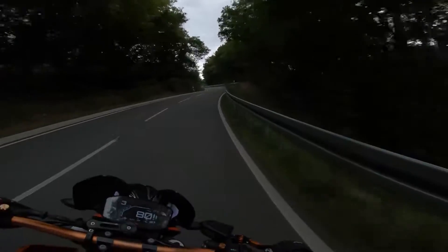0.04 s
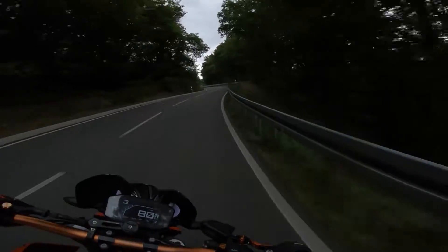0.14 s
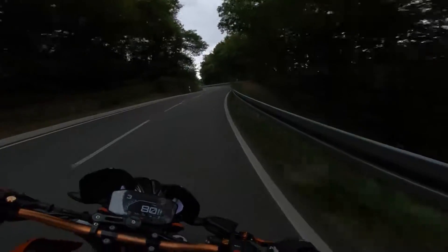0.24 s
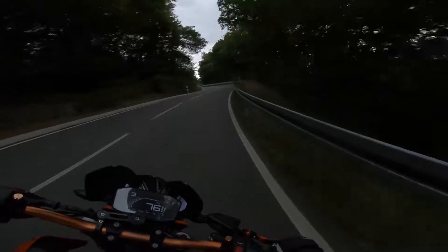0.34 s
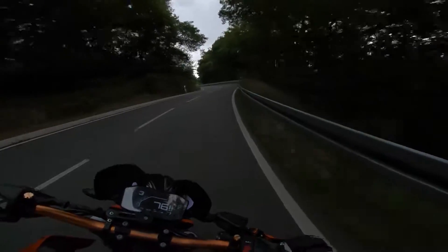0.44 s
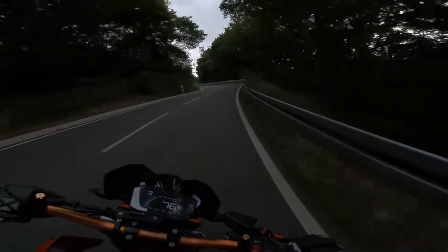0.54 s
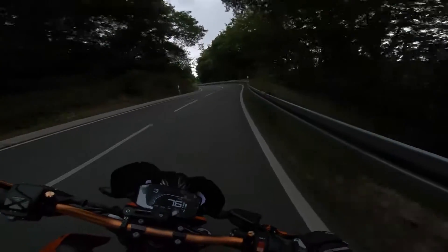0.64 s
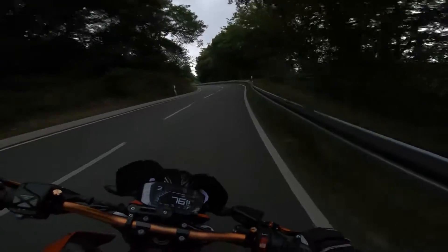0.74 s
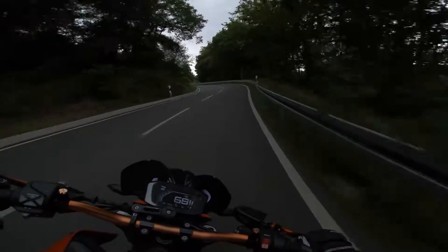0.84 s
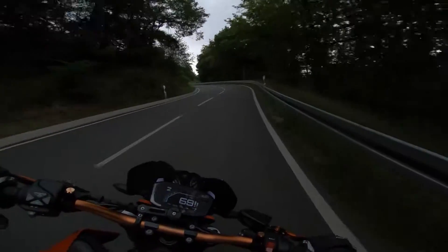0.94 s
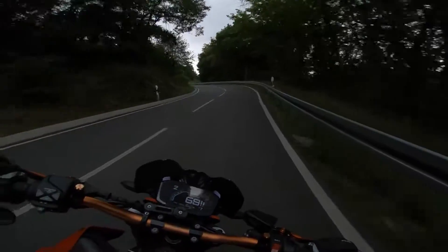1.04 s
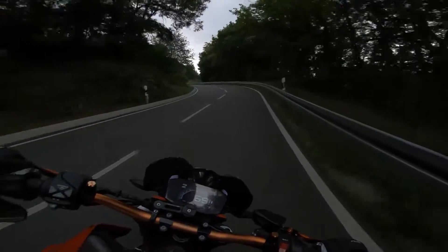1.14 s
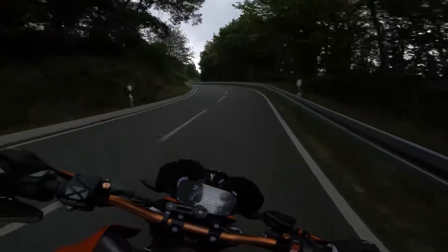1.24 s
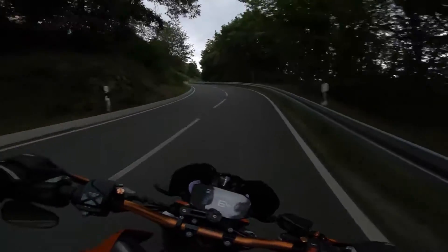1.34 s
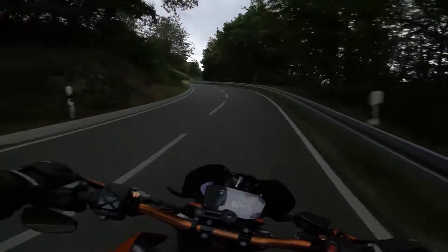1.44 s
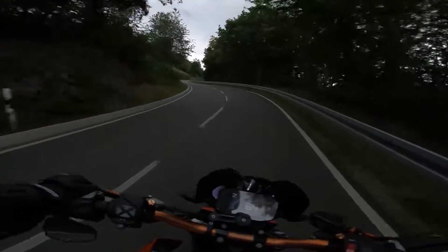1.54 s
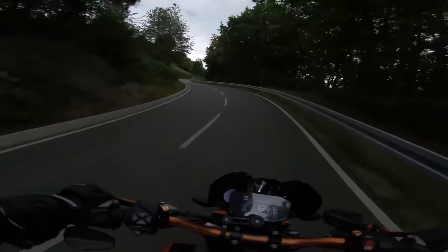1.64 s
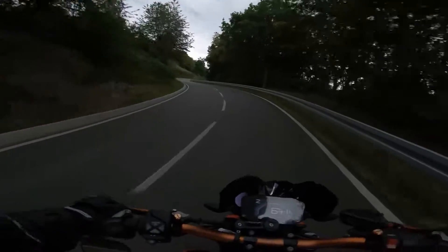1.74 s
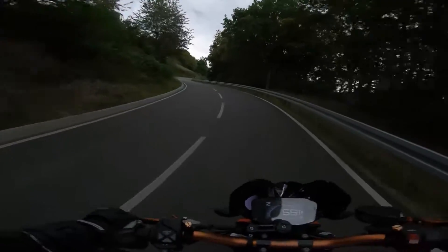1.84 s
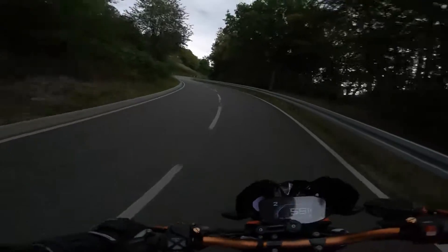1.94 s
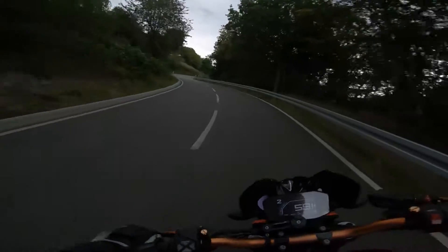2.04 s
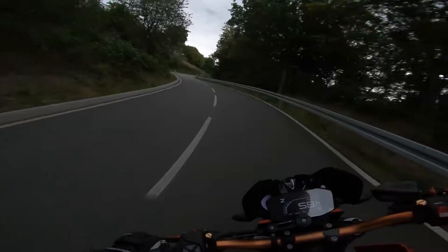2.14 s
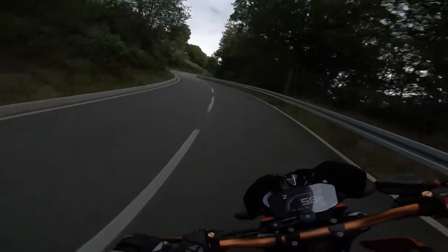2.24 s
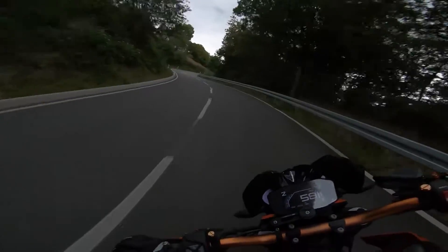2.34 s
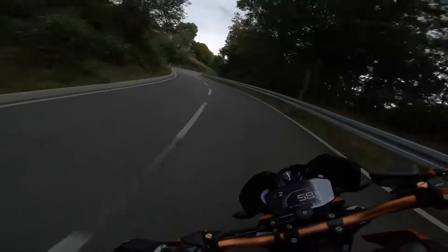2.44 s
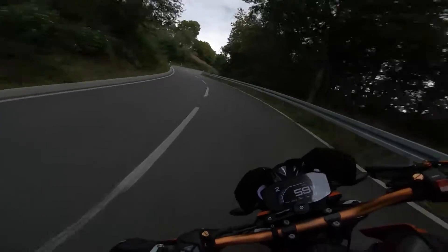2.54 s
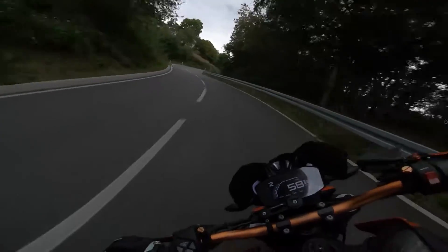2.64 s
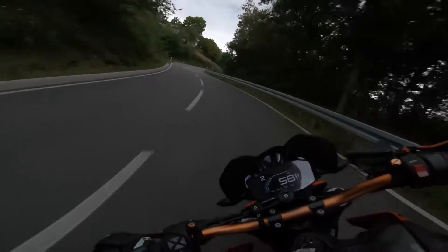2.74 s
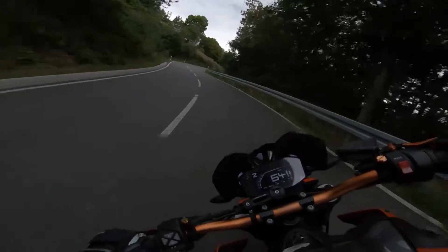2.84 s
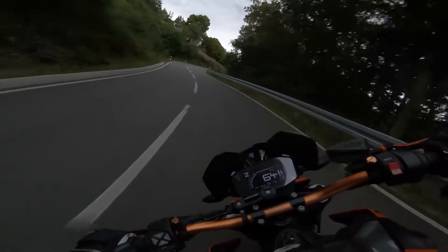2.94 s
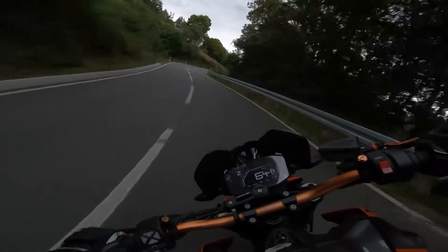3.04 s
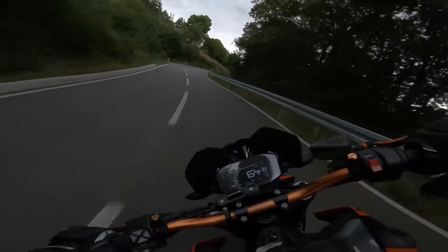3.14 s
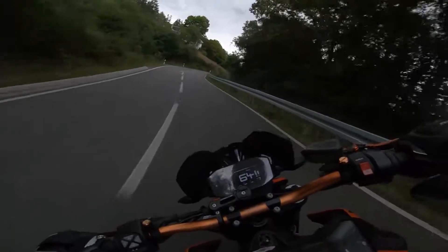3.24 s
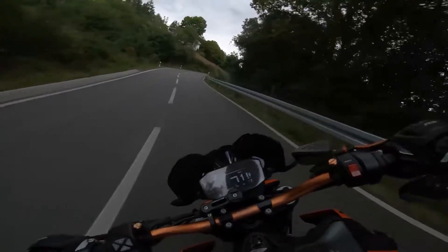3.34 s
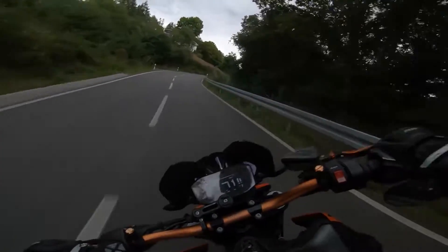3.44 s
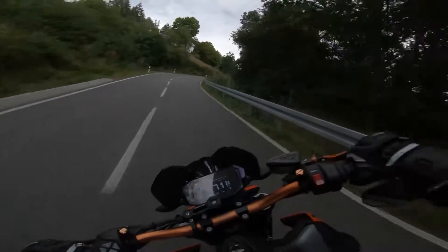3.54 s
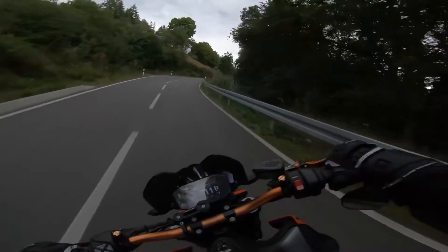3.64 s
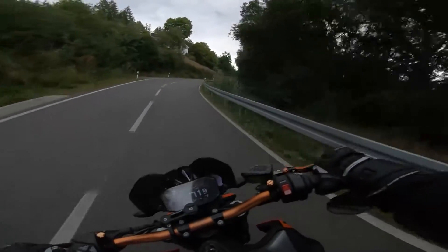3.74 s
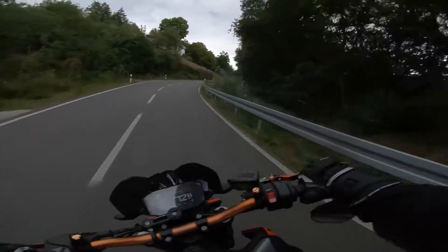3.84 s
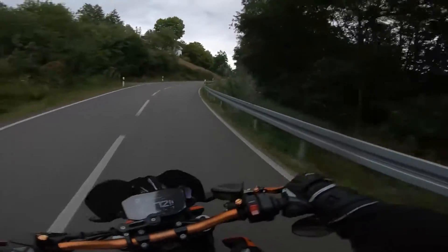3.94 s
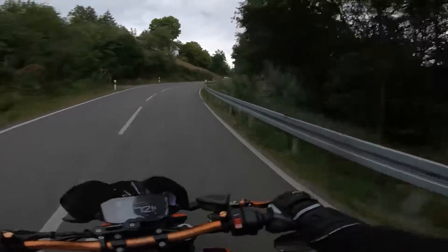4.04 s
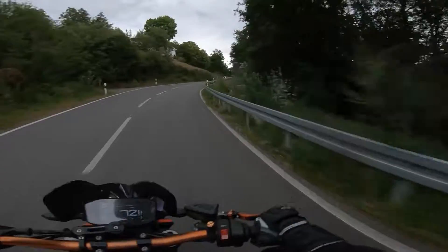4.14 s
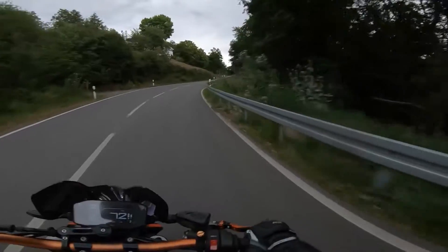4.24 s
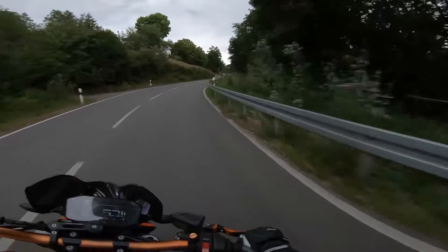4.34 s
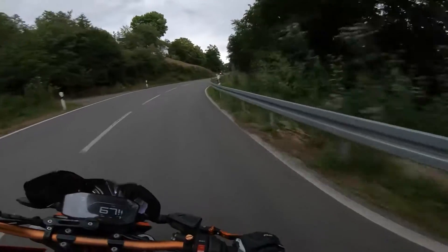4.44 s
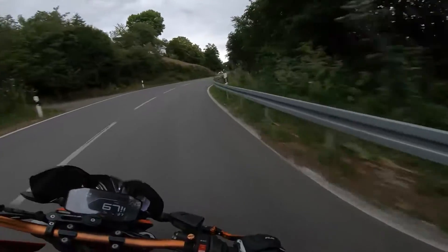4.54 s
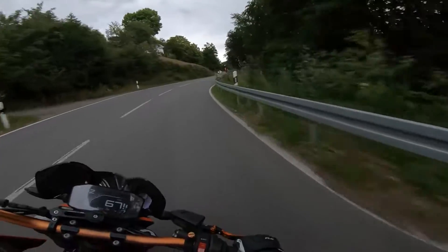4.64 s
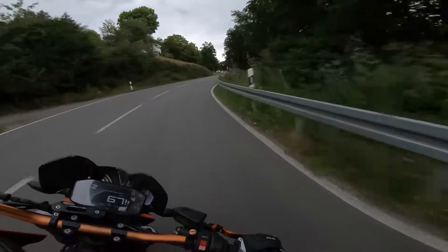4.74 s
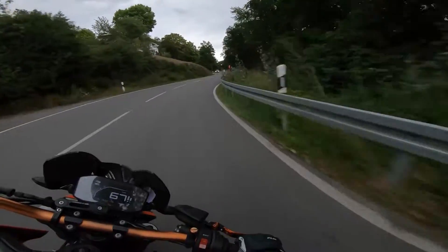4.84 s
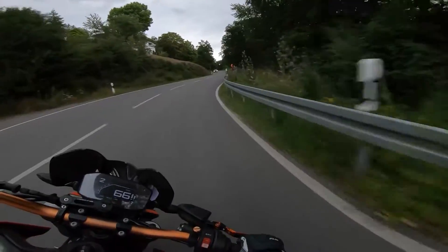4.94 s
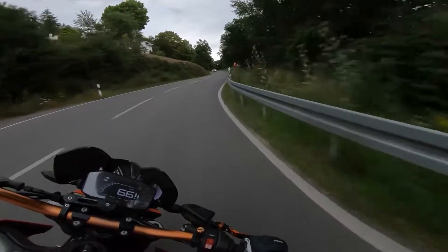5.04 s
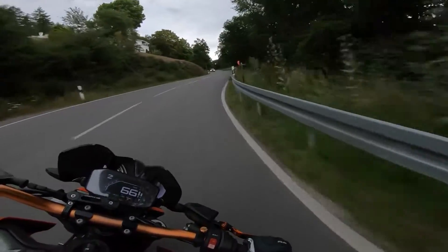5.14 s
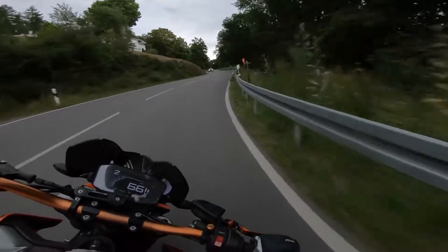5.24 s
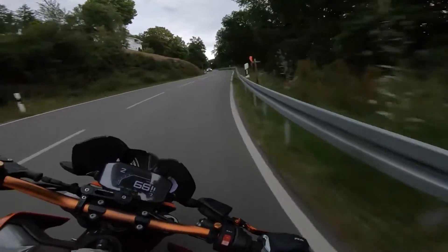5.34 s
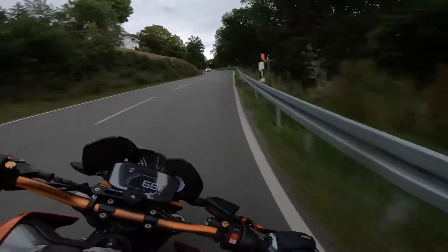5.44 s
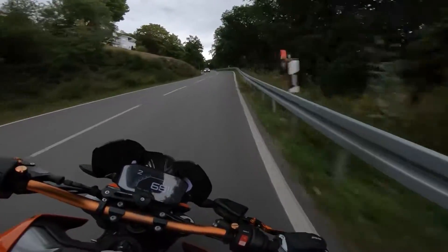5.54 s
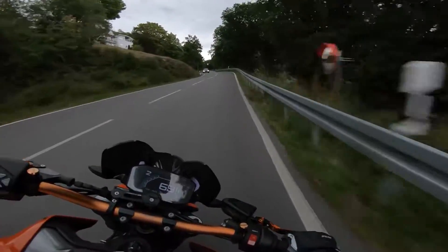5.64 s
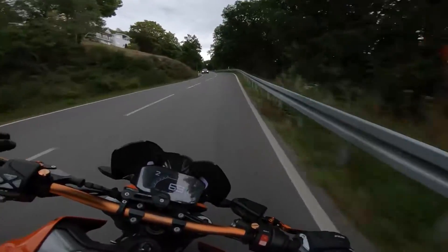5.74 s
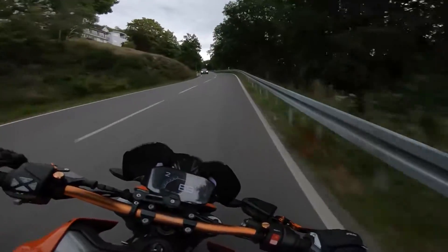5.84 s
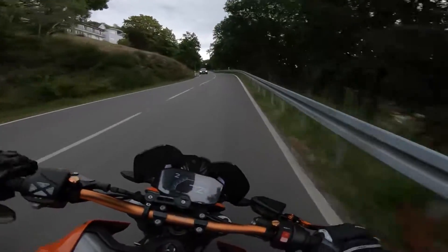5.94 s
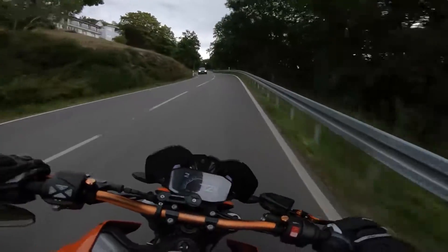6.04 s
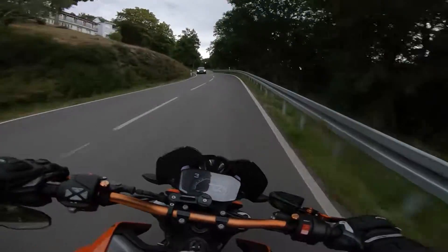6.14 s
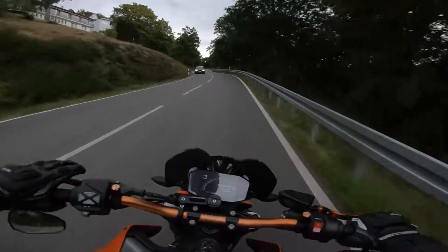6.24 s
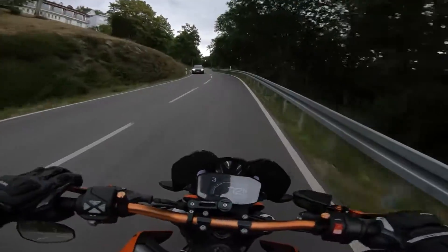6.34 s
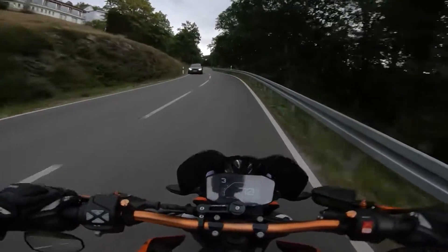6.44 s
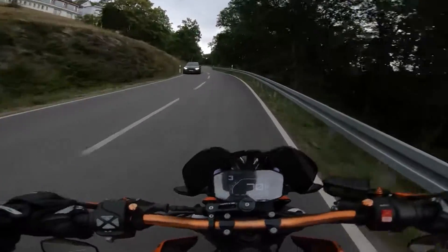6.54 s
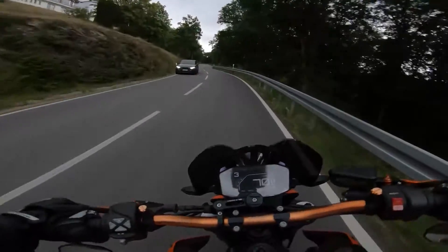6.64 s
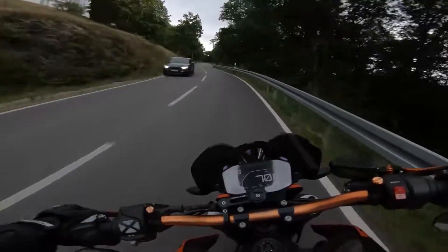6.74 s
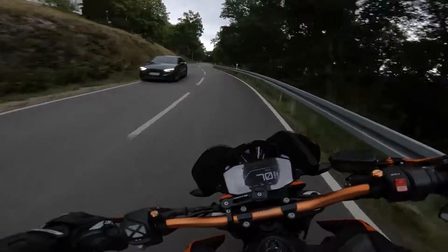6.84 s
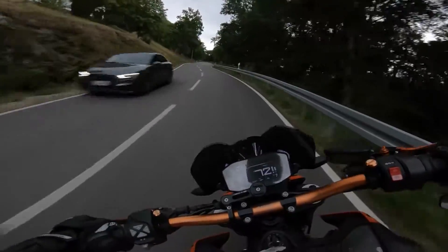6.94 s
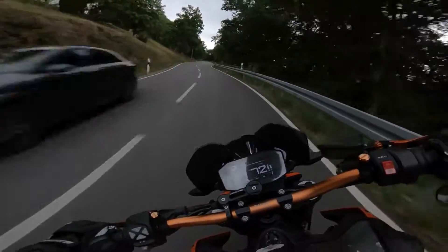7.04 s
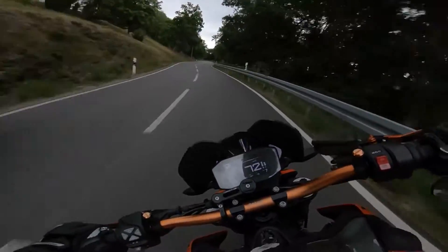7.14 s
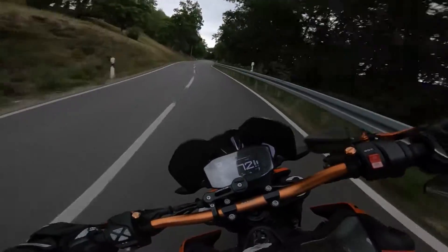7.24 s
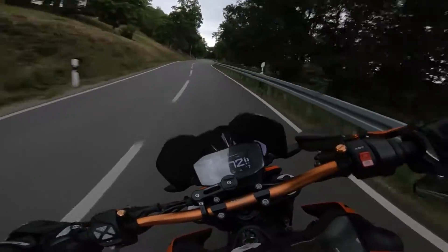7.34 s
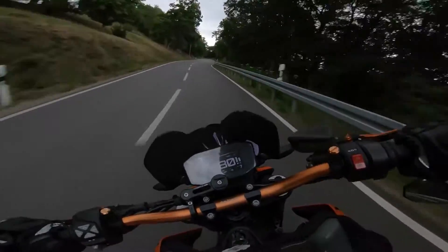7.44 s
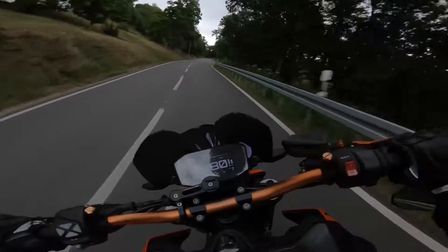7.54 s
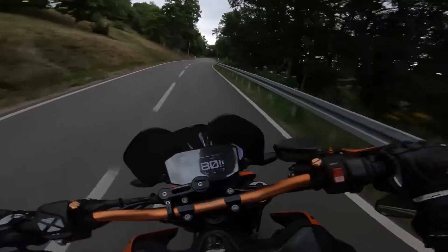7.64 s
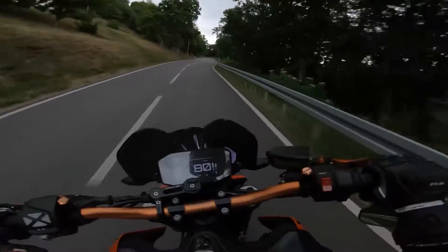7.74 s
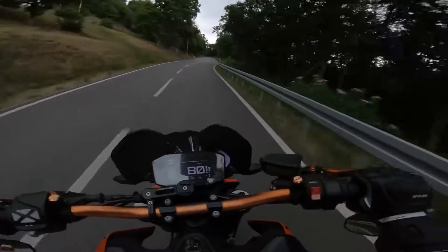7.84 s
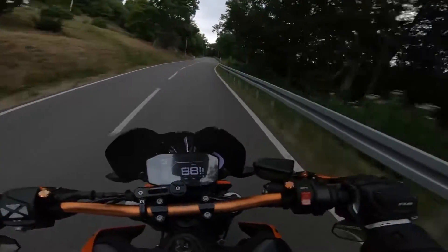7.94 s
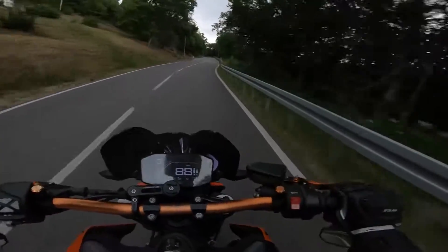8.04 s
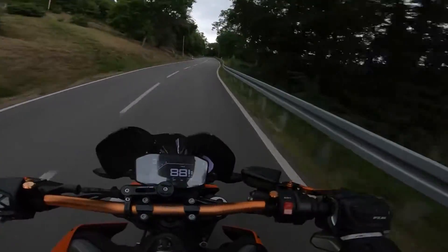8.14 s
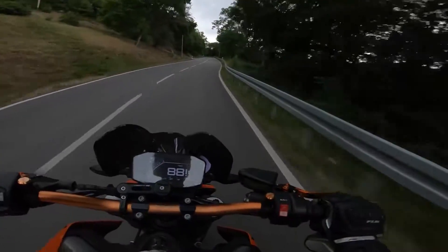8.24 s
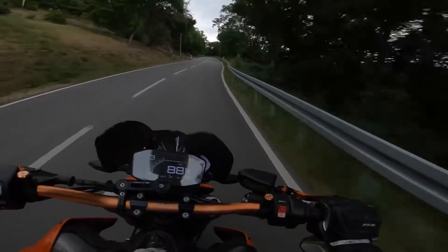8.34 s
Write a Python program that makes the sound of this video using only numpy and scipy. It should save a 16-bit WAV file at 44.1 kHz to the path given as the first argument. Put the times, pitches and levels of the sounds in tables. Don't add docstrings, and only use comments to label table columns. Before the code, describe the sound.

A twin-cylinder motorcycle throttles down with a thick crackle of exhaust pops, pulls away hard, shifts gear through more pops and accelerates loudly again.

```python
import sys
import numpy as np
from scipy import signal
from scipy.fft import rfft, irfft, next_fast_len
from scipy.io import wavfile
from scipy.ndimage import uniform_filter1d

SR = 44100
rng = np.random.default_rng(int(sys.argv[2]) if len(sys.argv) > 2 else 0)


def put_to_file(sound):
    columns = np.atleast_2d(sound).T
    safe = np.clip(columns, -1, 1)
    whole_steps = np.round(safe * 32767)
    wavfile.write(sys.argv[1], SR, whole_steps.astype(np.int16))


def makeup_ratio(level_db):
    decades = np.asarray(level_db, float) / 20
    return 10 ** decades


N = 370440
TIME = np.arange(N) / SR

# time in seconds, cycles per second (both cylinders fire once a cycle).
REVS = [(0.0, 40.56), (0.3, 39.01), (0.57, 36.89), (0.73, 46.57), (0.9, 45.12), (1.05, 44.23),
        (1.26, 44.57), (1.79, 38.16), (1.95, 40.91), (2.12, 39.89), (2.28, 41.47), (2.46, 42.61),
        (2.68, 45.28), (2.9, 48.25), (3.12, 50.37), (3.37, 52.7), (3.53, 51.82), (3.65, 50.19),
        (3.77, 49.7), (4.0, 47.08), (4.23, 45.25), (4.49, 44.61), (4.64, 44.74), (4.79, 45.68),
        (5.1, 47.54), (5.4, 49.32), (5.7, 49.96), (5.95, 50.28), (6.25, 37.83), (6.45, 37.91),
        (6.62, 37.44), (6.78, 38.72), (6.95, 40.6), (7.13, 42.9), (7.32, 44.77), (7.56, 46.63),
        (7.68, 48.12), (7.8, 48.27), (7.92, 49.16), (8.05, 50.44), (8.22, 52.39), (8.4, 54.41)]
# time in seconds, jerk in cycles per second, width in seconds.
CHAIN_JERKS = [
    (3.63, -1.92, .06),
    (4.679, .47, .06),
    (6.461, .74, .06),
    (6.475, 2, .03),
    (6.545, -2, .03),
]
# time in seconds, place in the list of exhaust notes (0 to 12).
THROTTLE = [(.58, 0.2), (.7, 0.8), (1.85, 1), (1.95, 1.78), (2.28, 2), (2.42, 2.92), (2.66, 2.98),
            (2.819, 6.99), (3.251, 6.87), (3.481, 5.87), (3.581, 6), (3.62, 1), (4.6, 0.7), (4.75, 3.9),
            (4.95, 4), (5.35, 4.7), (5.98, 5), (6.04, 0.82), (6.42, 0.98), (6.498, 7.88), (6.8, 7.98),
            (6.981, 8.98), (7.059, 8.97), (7.25, 9.79), (7.55, 10), (7.799, 10.87), (8.02, 11),
            (8.25, 11.93)]
# time in seconds, level in dB.
LOUDNESS = [(0, -23.5), (.56, -25.5), (.7, -28.5), (.76, -22), (1.3, -23), (2.0, -27), (2.5, -27.5),
            (2.7, -21.5), (3.05, -19.5), (3.46, -18), (3.57, -21), (4.5, -23), (4.73, -29.5), (5.36, -22.5),
            (6.95, -22), (7.27, -18), (7.95, -18.5), (8.4, -15)]
# start and end in seconds, scatter of the firings in dB, change of level in dB.
STUMBLES = [
    (.58, .73, 5.5, 2),
    (1.06, 2.05, 3, -0.14),
    (2.05, 2.45, 1, 0.5),
    (3.56, 3.65, 3, -0.5),
    (4.5, 4.74, 3.5, 1.5),
    (6.02, 6.15, 3, 0.4),
    (6.15, 6.48, 3.5, -4.5),
    (6.48, 6.64, 1, -4),
]
# time in seconds, sharp crack in dB, dull thump in dB.
POPS = [(0.588, -37, -36), (0.626, -42.5, -20.5), (1.083, -31.5, -15.5), (1.221, -42, -32.5),
        (1.255, -38, -20.5), (1.2879, -29.5, -16), (1.3264, -37.5, -35), (1.3581, -28, -17),
        (1.3836, -37.5, -28.5), (1.4193, -46.5, -26), (1.4779, -27.5, -15), (1.5519, -31, -17),
        (1.6253, -37.5, -22.5), (1.667, -38, -19.5), (1.702, -35.5, -35.5), (1.7386, -37.5, -21),
        (1.8235, -37, -19.5), (1.8413, -36, -25), (1.874, -41, -47), (1.974, -37, -23.5),
        (2.809, -37.5, -38), (3.683, -37, -38), (3.992, -39, -43.5), (4.526, -29.5, -17.5),
        (4.539, -42.5, -20), (4.838, -50.5, -34.5), (5.853, -46, -37), (6.0421, -44.5, -25.5),
        (6.067, -45.5, -35), (6.0785, -45, -20), (6.108, -31, -17.5), (6.123, -43.5, -24.5),
        (6.155, -41.5, -21.5), (6.206, -45, -31), (6.2593, -41.5, -23), (6.2847, -32.5, -15.5),
        (6.335, -44.5, -27), (6.369, -45, -24.5)]

# multiple of the cycle rate, level in dB.
SHUT_LOW = [(1, -30), (2, -10), (3, 0), (4, -5.5), (5, 1.5), (6, -2.5), (7, -19.5), (8, -8), (9, -24),
            (10, -28), (11, -27.5), (12, -37), (13, -32.5), (14, -29.5), (15, -24), (16, -30), (17, -21.5),
            (18, -35.5), (19, -29.5), (20, -32.5), (21, -40), (22, -48)]
SHUT = [(1, -30.5), (2, -10), (3, 2), (4, -14), (5, -5), (6, -9.5), (7, -17.5), (8, -27.5), (9, -36.5),
        (10, -24), (11, -38), (12, -22), (13, -29.5), (14, -32.5), (15, -28.5), (16, -30.5), (17, -37),
        (18, -32.5), (19, -45), (20, -43), (21, -46.5), (22, -45.5)]
COAXED = [(1, -11), (2, -21.5), (3, 1), (4, -7), (5, 4.5), (6, -5.5), (7, -13), (8, -22.5), (9, -18.5),
          (10, -15), (11, -20.5), (12, -27), (13, -16), (14, -21.5), (15, -31.5), (16, -30.5), (17, -26.5),
          (18, -29.5), (19, -29.5), (20, -35.5)]
PICKING_UP = [(1, -12.5), (2, -11.5), (3, 0.0), (4, 1), (5, -13), (6, 0), (7, -10), (8, -19.5), (9, -17),
              (10, -22.5), (11, -31.5), (12, -15), (13, -18.5), (14, -40), (15, -22), (16, -24.5),
              (17, -31), (18, -22), (19, -43), (20, -34), (21, -39.5), (22, -36.5)]
EASED = [(1, -8), (2, -6.5), (3, -2.5), (4, 1.5), (5, -4.5), (6, -7), (7, -13.5), (8, -16.5), (9, -21),
         (10, -22), (11, -18.5), (12, -13), (13, -19), (14, -29.5), (15, -29.5), (16, -32), (17, -32.5),
         (18, -24), (19, -40.5), (20, -36), (21, -26.5), (22, -45.5)]
PART = [(1, -11.5), (2, 1), (3, -1.5), (4, 2), (5, -12.5), (6, -11), (7, -20.5), (8, -17), (9, -20.5),
        (10, -21.5), (11, -17.5), (12, -20.5), (13, -25), (14, -33.5), (15, -27), (16, -38.5), (17, -37),
        (18, -30.5), (19, -38), (20, -39), (21, -27), (22, -42), (23, -33), (24, -43.5)]
LIFTING = [(1, -13.5), (2, -4.5), (3, -4), (4, 5.5), (5, -7.5), (6, -12.5), (7, -24.5), (8, -23.5),
           (9, -34.5), (10, -29), (11, -22.5), (12, -27.5), (13, -28), (14, -28.5), (15, -27.5),
           (16, -37.5), (17, -42), (18, -28), (19, -37), (20, -44)]
HALF = [(1, -18.5), (2, -4.5), (3, 0.5), (4, -2), (5, -1), (6, -4.5), (7, -14.5), (8, -14), (9, -38.5),
        (10, -28), (11, -18), (12, -22.5), (13, -20), (14, -26), (15, -32), (16, -35), (17, -44),
        (18, -39.5), (19, -34.5), (20, -37), (21, -39), (22, -37.5), (23, -44.5), (24, -25.5)]
OPENING = [(1, -13), (2, -16), (3, -1.5), (4, -14), (5, 3.5), (6, -2.5), (7, -5.5), (8, -20.5), (9, -14.5),
           (10, -11), (11, -19), (12, -30), (13, -24), (14, -30.5), (15, -25), (16, -24.5), (17, -26),
           (18, -19), (19, -33), (20, -32.5), (21, -36), (22, -44), (23, -34.5), (24, -38.5)]
PULLING = [(1, -13), (2, -10.5), (3, 0.5), (4, -2), (5, -3), (6, -0.5), (7, -10), (8, -7.5), (9, -18),
           (10, -18), (11, -30), (12, -24), (13, -17), (14, -26), (15, -30.5), (16, -23.5), (17, -25),
           (18, -33.5), (19, -26.5), (20, -33), (21, -37), (22, -40), (23, -29), (24, -28.5), (25, -33),
           (26, -29), (27, -40.5), (28, -47)]
WIDE = [(1, -17), (2, -7), (3, 0.5), (4, -8.5), (5, 0.5), (6, -2.5), (7, 2), (8, -11), (9, -12.5),
        (10, -19), (11, -22), (12, -27.5), (13, -21.5), (14, -25.5), (15, -23), (16, -29), (17, -31.5),
        (18, -28.5), (19, -33.5), (20, -30), (21, -40.5), (22, -35.5), (23, -30), (24, -35.5), (25, -37.5),
        (26, -36.5), (27, -33), (28, -30), (29, -40), (30, -32), (31, -25), (32, -36.5)]
HARD = [(1, -17), (2, 0), (3, 1.5), (4, -6), (5, 1), (6, 0), (7, 0), (8, -8), (9, -10.5), (10, -30.5),
        (11, -18), (12, -26), (13, -25), (14, -20), (15, -19.5), (16, -24.5), (17, -36.5), (18, -42.5),
        (19, -41.5), (20, -31.5), (21, -30.5), (22, -27.5), (23, -19.5), (24, -29.5), (25, -30), (26, -33),
        (27, -30), (28, -32), (29, -24), (30, -29.5), (31, -43), (32, -45.5)]
FLAT_OUT = [(1, -23), (2, 0.5), (3, -3), (4, 2.5), (5, 4.5), (6, 0.5), (7, -5.5), (8, -7), (9, -22.5),
            (10, -30), (11, -29), (12, -19), (13, -23), (14, -26), (15, -20.5), (16, -38), (17, -36),
            (18, -29.5), (19, -35), (20, -24), (21, -32.5), (22, -30), (23, -22), (24, -35.5), (25, -26),
            (26, -28), (27, -26), (28, -28.5), (29, -29), (30, -34), (31, -38), (32, -30.5)]
NOTES = [SHUT_LOW, SHUT, COAXED, PICKING_UP, EASED, PART, LIFTING, HALF, OPENING, PULLING, WIDE, HARD, FLAT_OUT]

SECOND_DB = np.array([-1, -1, -2, -1, -1, -1, -1, -1, -8, -8, -7, 2, -1])
STEEP_RAD = np.array([-.3, -.1, 0, .4, .6, .7, .7, .9, .1, .6, 1.1, 1.1, 1.1])
GAS_DB = [-54, -54, -51.5, -49.5, -48, -55.5, -57.5, -47, -48.5, -45.5, -46, -47.5, -51.5]
SPIT_DB = [2.8, 2.8, 2.4, 1.8, 1.5, 1.5, 1.3, 1.3, 1.2, 1.4, 1.6, 1.6, 1.6]
SECOND_SPIT_DB = [5, -2, 3, 1, 0, 0, 2, -5, -4, -4, -3, 2, 2]
EARLY_S = [0, 0, 0, 0, .006, .006, 0, 0, 0, 0, 0, 0, 0]
HISS = [.06, .05, .15, .15, .28, .28, .22, .15, .12, .06, .12, .22, .22]
BITE_DB = [-20, -21, -4, -7.5, -9, -11.5, -5, -8, -3.5, -8, -3.5, 0, -3.5]
RUSH_DB = [-42.5, -42, -41, -38, -39, -36.5, -39.5, -33.5, -41.5, -34, -32.5, -37, -38.5]
PAN_DB = [2.1, 3.6, 3.8, 3.7, 1.2, 3.1, 2.3, 0.94, 1.8, 2, 0.97, 1.5, 4.4]

# pitch in Hz, gain in dB.
PIPE = [(30, 0), (60, 0), (100, 0), (140, 0), (200, 0), (250, 0), (320, 0), (420, 0), (490, 1), (570, 2),
        (660, -1), (800, 2), (1000, 3), (1400, 2)]
# pitch in Hz, gain in dB.
GAS = [(250, -36.5), (500, -4), (800, -8.5), (1000, -11), (1400, -5.5), (1750, -11), (2100, -14.5),
       (2600, -22.5), (3300, -38), (4200, -38.5), (5000, -40), (7000, -48.5), (8500, -57), (10000, -52),
       (13000, -64.5), (16000, -71)]
# pitch in Hz, gain in dB.
CRACK = [(400, -13), (700, 2), (1000, 3.5), (1500, 4.5), (2200, -5), (3200, -24), (4700, -36.5),
         (7000, -57), (11000, -71.5), (16000, -87.5)]
# pitch in Hz, level in dB.
RUSH = [(15, -14), (30, -6.5), (50, -10.5), (80, -11.5), (150, -6.5), (250, -13.5), (500, -16.5),
        (900, -28), (1600, -43), (3100, -46), (4200, -64), (6000, -70.5), (10000, -94)]
# pitch in Hz, left minus right in dB.
SHADE = [(50, 0), (90, 1), (140, 2), (200, 1.5), (260, 3), (330, 1), (550, 1.5), (780, 3.5), (1050, 8),
         (1400, 12), (1900, 10.5), (2600, 7), (3600, 4), (5500, 3), (9000, 3.5)]
# pitch in Hz, delay in radians.
LATE = [(0, 0), (90, .7), (140, .8), (200, 1.45), (260, 1.2), (400, .7), (560, -.5), (780, .4), (1050, 3),
        (1400, 4.8), (1900, 5.6), (2600, 6.2), (7000, 6.4), (22050, 7)]
# start and end in seconds, level in dB.
WHINE = [
    (1.9, 2.3, -74.5),
    (2.3, 2.97, -70.5),
    (4.72, 5.95, -76.5),
    (6.45, 6.97, -71),
    (6.97, 7.2, -68.5),
    (7.2, 7.68, -71),
    (7.68, 8.6, -84),
]
# start and end in seconds, level in dB.
INTAKE = [
    (4.9, 5.98, -83.5),
]
# start and end in seconds, extra bass in dB.
BUFFETS = [
    (3.601, 4.046, 5),
    (5.951, 6.103, 3),
    (6.451, 6.714, 8.5),
]

START_TURN = .43
SECOND_FIRING = 285 / 720
SHORT_PIPE_S = .0008
STEADY_DB, STUMBLE_EDGE_S = .55, .05
RASP_SLOPE, MIDDLE_DB, QUIET_DB = 1.9, -22.5, -32
WHINE_TEETH = 78.1
WHINE_OFF_DB, WHINE_EDGE_S = -95, .12


def revs():
    rate, = curve(REVS)
    for s, jerk, width in CHAIN_JERKS:
        rate = rate + jerk * np.exp(-.5 * ((TIME - s) / width) ** 2)
    return rate


def firings(cycles):
    first = np.arange(1, int(cycles[-1]) + 1)
    both = np.column_stack([first, first + SECOND_FIRING]).ravel()
    return np.interp(both, cycles, TIME)


def exhaust(cycles, when, chance, level_db):
    scatter_db = np.interp(when, TIME, spells(STUMBLES, 2, STEADY_DB, STUMBLE_EDGE_S))
    last = np.clip(np.searchsorted(when - .002, TIME) - 1, 0, None)
    firing_size = makeup_ratio(scatter_db * np.minimum(chance[1], .8))
    strength = uniform_filter1d(firing_size[last], size=90)
    firing_shift = .001 * scatter_db ** 2 * chance[0]
    stumble = uniform_filter1d(firing_shift[last], size=200)
    pop_s, _, thump_db = np.transpose(POPS)
    spent = puff(clicks(pop_s - .004, np.clip(makeup_ratio(thump_db + 22), 0, 1)), .002, .012)
    t, turns = TIME[::8], (cycles + stumble)[::8]
    stack, stray = 0, rng.standard_normal(40)
    for k in range(1, len(WIDE) + 1):
        db = [dict(note).get(k, -14 - .9 * k) for note in NOTES]
        twin = np.angle(1 + makeup_ratio(SECOND_DB) * np.exp(-2j * np.pi * k * SECOND_FIRING))
        echo = np.clip(.2 * (k - 7), 0, 1.2) * stray[k]
        lead = by_note(twin - STEEP_RAD, t) + echo
        stack = stack + makeup_ratio(by_note(db, t)) * np.cos(2 * np.pi * k * turns + lead)
    stack = signal.resample_poly(stack, 8, 1, padtype="reflect")[:N]
    stack = stack / np.sqrt(uniform_filter1d(stack ** 2, size=4000))
    burning = 1 - np.clip(spent, 0, .8)
    return colour(stack * strength * burning * makeup_ratio(level_db + 1.5), PIPE)


def thumps():
    pop_s, _, thump_db = np.transpose(POPS)
    t = np.arange(3000) / SR - .014
    push = np.exp(-.5 * (t / .0019) ** 2) * np.cos(2 * np.pi * 210 * t)
    ring = .45 * np.cos(2 * np.pi * 140 * t) * np.exp(-np.abs(t) / np.where(t > 0, .014, .003))
    knock = .14 * np.cos(2 * np.pi * 650 * t) * np.exp(-.5 * (t / .0016) ** 2)
    blunt = np.convolve(push + ring + knock, np.hanning(24) / 11.5, "same")
    return signal.fftconvolve(clicks(pop_s - .012, makeup_ratio(thump_db + 5)), blunt)[:N]


def cracks():
    pop_s, crack_db, _ = np.transpose(POPS)
    norm = np.std(colour(rng.standard_normal(N), CRACK))

    def spit(db):
        click = clicks(pop_s + .0011, makeup_ratio(db + 16))
        cloud = puff(clicks(pop_s, makeup_ratio(db - .4)), .0025, .0018)
        return click + cloud * rng.standard_normal(N)

    def edge():
        bright = band_pass(spit(2 * crack_db - 3.5), 2800, 6000)
        return (colour(spit(crack_db), CRACK) + bright) / norm

    return pair(edge(), edge(), .23)


def gas(when, chance, level_db):
    second = np.arange(len(when)) % 2
    second_db = by_note(SECOND_SPIT_DB, when)
    when = when - by_note(EARLY_S, when) - SHORT_PIPE_S * second
    sizes = makeup_ratio(by_note(SPIT_DB, when) * chance + second_db * second)
    gate = unit(puff(clicks(when - .0026, sizes), .004, .0018) + by_note(HISS))
    rattle = rng.standard_normal(400) * np.exp(-np.arange(400) / SR / .0009)
    rattle = np.convolve(rattle, np.hanning(9))
    snap = unit(signal.fftconvolve(clicks(when - .0015, sizes), rattle)[:N])

    def spits():
        return unit(colour(gate * rng.standard_normal(N) + .4 * snap, GAS))

    rasp = pair(spits(), spits(), .13)
    bite = band_pass(rasp, 2500, 4000)
    return makeup_ratio(level_db + 7) * (rasp + makeup_ratio(by_note(BITE_DB)) * bite)


def whine(cycles):
    level_db = spells(WHINE, 2, WHINE_OFF_DB, WHINE_EDGE_S)
    wander = np.cumsum(walk(400)) * 2 * np.pi * 38 / SR
    mesh = makeup_ratio(walk(40)) * np.sin(2 * np.pi * WHINE_TEETH * cycles + wander)
    hiss = band_pass(rng.standard_normal((2, N)), 4200, 7400)
    air = unit(band_pass(hiss, 6200, 7500))
    air_db = spells(INTAKE, 2, -105, .4)
    return makeup_ratio(level_db) * mesh + makeup_ratio(.4 * level_db - 46) * hiss + makeup_ratio(air_db) * air


def rush():
    out = 0
    hz_table, db_table = np.transpose(RUSH)
    buffet_db = spells(BUFFETS, 2, 0, .075)
    for hz in 22 * 2 ** np.arange(0, 9, .5):
        shared, other = band_pass(rng.standard_normal((2, N)), hz / 2 ** .25, hz * 2 ** .25)
        db = np.interp(np.log(hz), np.log(hz_table), db_table) + 1.3 * walk(2.6) + buffet_db * (hz < 130)
        alike = np.clip(1 - hz / 900, .2, 1) * .8
        own = np.clip(hz / 150, .6, .7) * (1 - .3 * (800 < hz < 3000))
        out = out + makeup_ratio(db) * np.array([shared, alike * shared + own * other])
    gust_db = by_note(RUSH_DB) + .4 * walk(2.2)
    return unit(out) * makeup_ratio(.59 * gust_db - 12)


def right_ear(x):
    x = np.pad(x, 2048, "reflect", reflect_type="odd")
    size = next_fast_len(len(x))
    hz = np.arange(size // 2 + 1) * SR / size + 1
    shade_hz, shade_db = np.transpose(SHADE)
    shade = makeup_ratio(-np.interp(np.log(hz), np.log(shade_hz), shade_db))
    delay = np.exp(-1j * np.interp(hz, *np.transpose(LATE)))
    return irfft(rfft(x, size) * shade * delay, size)[2048:N + 2048]


def pair(shared, other, likeness):
    right = likeness * shared + np.sqrt(1 - likeness ** 2) * other
    return np.array([shared, right_ear(right)])


def by_note(values, t=TIME):
    s, place = np.transpose(THROTTLE)
    return np.interp(t, s, np.interp(place, range(len(values)), values))


def spells(table, column, rest, edge_s):
    out = np.full(N, float(rest))
    for row in table:
        inside_s = np.minimum(TIME - row[0], row[1] - TIME)
        out += (row[column] - rest) * np.clip(inside_s / edge_s + .5, 0, 1)
    return out


def curve(table):
    s, *columns = np.transpose(table)
    return [np.interp(TIME, s, c) for c in columns]


def unit(x):
    return x / np.sqrt(np.mean(x ** 2))


def band_pass(x, low_hz, high_hz):
    return signal.sosfilt(signal.butter(2, [low_hz, high_hz], "band", fs=SR, output="sos"), x)


def colour(x, spectrum):
    hz, db = np.transpose(spectrum)
    grid = np.arange(4097) * SR / 8192 + 1
    cepstrum = irfft(np.interp(np.log(grid), np.log(hz), db) * np.log(10) / 20)
    cepstrum[1:4096] *= 2
    cepstrum[4097:] = 0
    return signal.fftconvolve(x, irfft(np.exp(rfft(cepstrum))))[:N]


def clicks(seconds, sizes):
    place = np.clip(seconds * SR, 0, N - 2)
    whole = place.astype(int)
    part = place - whole
    return np.bincount(whole, sizes * (1 - part), N) + np.bincount(whole + 1, sizes * part, N)


def puff(x, rise_s, fall_s):
    t = np.arange(int(8 * fall_s * SR)) / SR
    shape = (1 - np.exp(-t / rise_s)) * np.exp(-t / fall_s)
    return signal.fftconvolve(x, shape / shape.max())[:N]


def walk(rate):
    k = int(SR / rate)
    steps = np.repeat(rng.standard_normal(N // k + 1), k)
    return 2.1 * uniform_filter1d(uniform_filter1d(steps, k), k)[:N]


def scene():
    level_db = curve(LOUDNESS)[0] + spells(STUMBLES, 3, 0, STUMBLE_EDGE_S)
    gas_db = by_note(GAS_DB) + RASP_SLOPE * (np.maximum(level_db, QUIET_DB) - MIDDLE_DB)
    gas_db = uniform_filter1d(gas_db, size=5000)
    cycles = START_TURN + np.cumsum(revs()) / SR
    when = firings(cycles)
    chance = rng.standard_normal((3, len(when)))
    body = exhaust(cycles, when, chance, level_db) + thumps()
    body = np.array([body, right_ear(body) * makeup_ratio(2 - by_note(PAN_DB))])
    return body + gas(when, chance[2], gas_db) + cracks() + whine(cycles) + rush()


def low_pass(x):
    return signal.sosfilt(signal.butter(12, 15700, fs=SR, output="sos"), x)


def record(dry):
    mix = np.tanh(0.71 * dry) / 0.72
    return low_pass(mix)


dry = scene()
out = record(dry)
put_to_file(out)
```